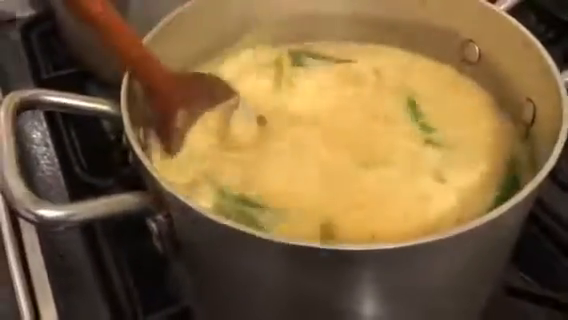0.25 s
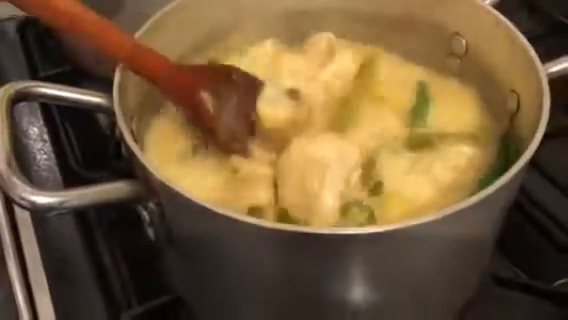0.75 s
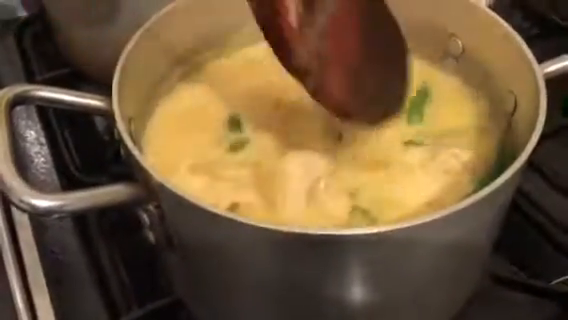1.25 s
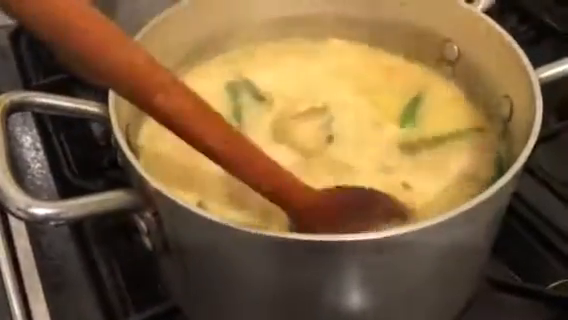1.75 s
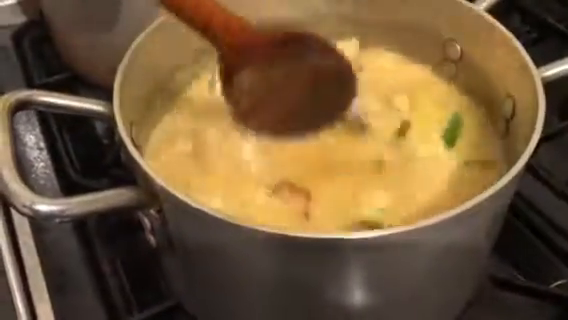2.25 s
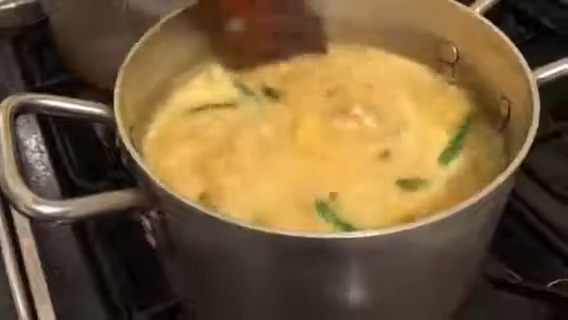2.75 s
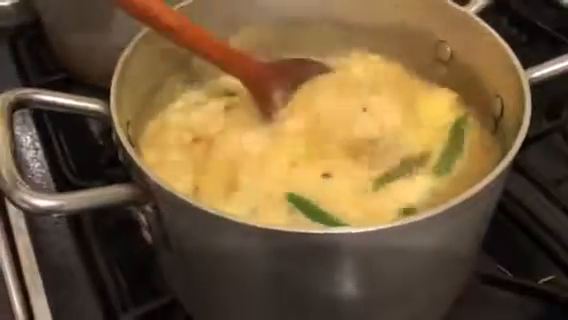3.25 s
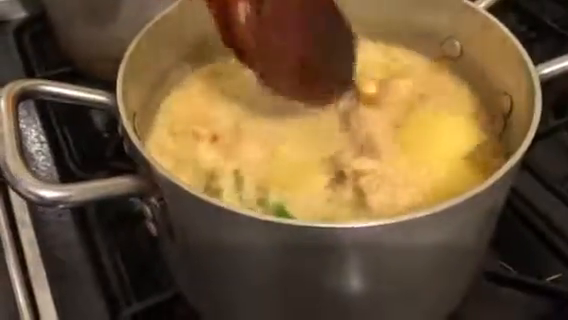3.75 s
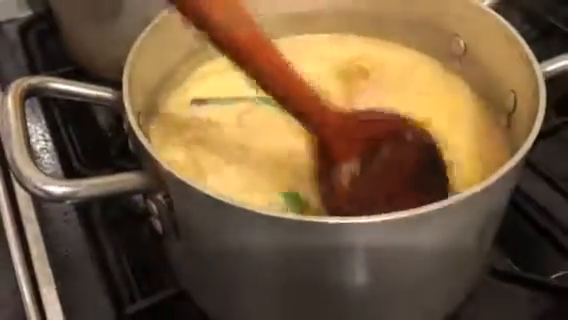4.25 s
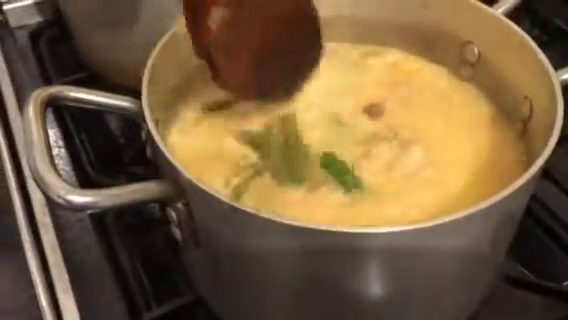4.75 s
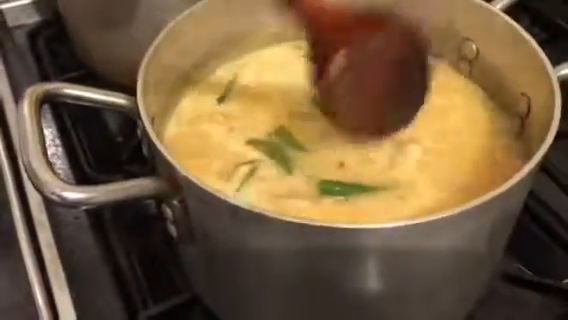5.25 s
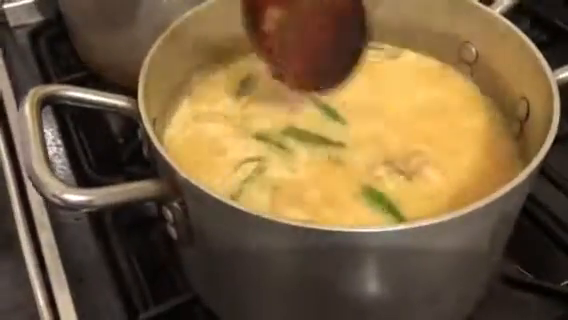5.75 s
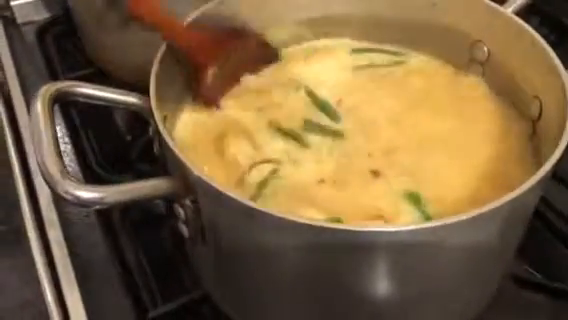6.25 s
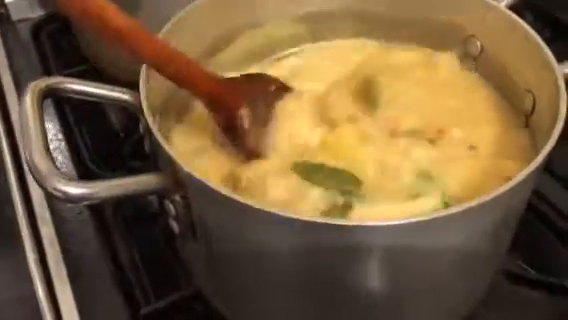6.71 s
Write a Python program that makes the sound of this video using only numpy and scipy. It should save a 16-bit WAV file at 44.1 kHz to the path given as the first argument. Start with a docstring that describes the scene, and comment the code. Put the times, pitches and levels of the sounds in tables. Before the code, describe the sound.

A wooden spoon knocks and scrapes against a metal pot of thick simmering soup, with wet bubble plops and a soft gas burner hiss.

```python
"""A wooden spoon stirs thick soup in a metal pot on a gas stove, close by in a small kitchen.
Its knocks excite damped pot modes under a noise clack; its scrapes drive the modes with random slips.
Now and then a single mode squeaks. Bubbles are short sines of rising pitch, wet clicks are noise bursts.
The burner underneath is filtered noise: a low fluttering flame and a hissing gas jet."""
import sys
import numpy as np
from scipy import signal
from scipy.fft import rfft, irfft
from scipy.io import wavfile

SR = 44100
rng = np.random.default_rng(int(sys.argv[2]) if len(sys.argv) > 2 else 0)


def int16_out(signal):
    """Quantize to a 16-bit WAV file."""
    q = np.round(np.clip(np.atleast_2d(signal).T, -1, 1) * 32767)
    wavfile.write(sys.argv[1], SR, q.astype(np.int16))


N = 307818
T = np.arange(N) / SR  # s
AGE = T[:SR // 2]  # s since an event began
TOP_HZ = 15750


def undb(db):
    """Level law: decibels to amplitude gain."""
    return 10 ** (np.asarray(db) / 20)


def unit(x):
    """Normalisation: scale to rms 1."""
    return x / np.sqrt(np.mean(x ** 2))


def fade(t60):
    """Exponential damping: the amplitude loses 60 dB in t60 seconds."""
    return np.exp(-np.log(1000) * AGE / t60)


def add(track, s, sound):
    """Superposition: mix a sound in from time s."""
    i = max(0, int(s * SR))
    track[i:i + len(sound)] += sound[:max(0, N - i)]


def colour(x, points):
    """Minimum-phase filtering: folding the cepstrum of the (Hz, dB) gain makes the filter causal."""
    size = 4096
    hz, db = np.transpose(points)
    grid = np.log(np.fft.rfftfreq(size, 1 / SR) + 1)
    log_gain = np.log(undb(np.interp(grid, np.log(hz), db)))
    cepstrum = irfft(log_gain)
    cepstrum[1:size // 2] *= 2
    cepstrum[size // 2 + 1:] = 0
    impulse = irfft(np.exp(rfft(cepstrum)))
    return signal.fftconvolve(x, impulse)[:len(x)]


def band(x, lo_hz, hi_hz, order=3):
    """Band limiting: a Butterworth band-pass kept below TOP_HZ."""
    edges = [min(lo_hz, TOP_HZ - 100), min(hi_hz, TOP_HZ)]
    return signal.sosfilt(signal.butter(order, edges, "band", fs=SR, output="sos"), x)


def walk(rate):
    """Random modulation: straight lines between normal draws, rate of them per second."""
    return np.interp(T * rate, np.arange(N // 10), rng.standard_normal(N // 10))


# modes of the filled pot: pitch_hz [Hz], t60_s [s], struck_db [dB],
# high_db [dB, rubbed high on the wall], deep_db [dB, rubbed deep in the soup]
POT_MODES = [(390.6, 0.25, -14.5, -16.5, -7), (515, 0.094, -27, -44, -6), (627, 0.066, -37, -22.5, 3),
             (689, 0.062, -1.5, -3, -3.5), (747.8, 0.19, 4.5, -1, 3.5), (958, 0.06, -7, -10, -13.5),
             (1133, 0.21, -2.5, -3.5, -9.5), (1188, 0.21, -6, 13.5, -37), (1260, 0.06, -1.5, -7, -16.5),
             (1525, 0.05, -1, -1, -17), (1596, 0.12, 7.5, 0, -12), (1780, 0.12, -2.5, -3.5, -28),
             (2140, 0.13, 0, -8.5, -15.5), (2294, 0.11, -0.5, -2, -17), (2341, 0.16, -1.5, -13, -33),
             (2375, 0.14, 2.5, -3, -27), (2874, 0.25, 1.5, -15.5, -17.5), (3268, 0.1, -1.5, -11.5, -21.5),
             (3765, 0.087, 0.5, -19, -21), (4267, 0.15, 0.5, -26, -26), (4294, 0.1, -3.5, -2, -42),
             (4820, 0.22, -38, -38, -20), (4890, 0.12, -8.5, -18, -31), (5190, 0.18, -9.5, -31, -32),
             (5700, 0.3, -15, -23, -29), (6290, 0.079, -30, -28, -23), (6620, 0.04, -1, -11.5, -28),
             (7710, 0.077, -8, -11, -30), (8500, 0.061, -11.5, -34, -30), (9200, 0.073, -9.5, -16, -41)]


def pot_ring(detune, scatter_db):
    """Modal superposition: one blow rings every mode; the sloshing soup shifts each a little."""
    hz, t60, db = np.transpose(POT_MODES)[:3]
    shift, size = rng.standard_normal((2, len(POT_MODES)))
    signs = rng.choice([-1, 1], len(POT_MODES))
    pitches = hz * (1 + detune * shift)
    gains = signs * undb(db + scatter_db * size)
    modes = zip(pitches, gains, t60)
    return sum(gain * np.sin(2 * np.pi * f * AGE) * fade(t) for f, gain, t in modes)


def shimmer(count=16):
    """High modal density: thin short-lived wall modes, differing with each place of contact."""
    out = np.zeros(len(AGE))
    for place, size in rng.random((count, 2)):
        tone = np.sin(2 * np.pi * 4900 * 2.1 ** place * AGE)
        out += size * tone * fade(0.25) * undb(-9 * place)
    return out


BOOM_HZ, BOOM_OCTAVES = 685, 0.52  # centre and width of the wall's boom
PING_HZ, PING_OCTAVES = 3040, 0.46  # centre and width of the rim's ping
TILT_HZ, TILT_FROM_HZ = 1720, 1110  # pivot of the tilt; below the second the tilt gain is constant


def blow_colour(bright_db, boom_db, ping_db):
    """Contact stiffness: a harder blow tilts to treble; its place brings out wall boom or rim ping."""
    hz = np.geomspace(200, 12000, 24)
    boom = np.exp(-.5 * (np.log2(hz / BOOM_HZ) / BOOM_OCTAVES) ** 2)
    ping = np.exp(-.5 * (np.log2(hz / PING_HZ) / PING_OCTAVES) ** 2)
    tilt = np.log2(np.maximum(hz, TILT_FROM_HZ) / TILT_HZ)
    return list(zip(hz, bright_db * tilt + boom_db * boom + ping_db * ping))


# spectrum of the dry clack of wood on metal: pitch_hz [Hz], level_db [dB]
CLACK_SPECTRUM = [(100, -27.5), (300, -0.5), (500, -13), (700, -4.5), (950, -6), (1550, 0.5), (1980, -14),
                  (2300, -6.5), (4200, -6), (4550, -16), (5100, -3), (8500, -19), (10500, -21),
                  (11700, -19.5), (15500, -25)]
# spoon knocks: start_s [s], level_db [dB], thump_db [dB, thump on the grate],
# bright_db [dB per octave], boom_db [dB, extra wall boom], ping_db [dB, extra rim ping]
SPOON_KNOCKS = [(0.541, -15.5, -37, -.5, 4.5, -8), (1.8875, -24, -65, -0.3, 8, -5),
                (2.8564, -26, -48, -7, 0, 0), (4.028, -16, -62, 1, 3.5, 0), (4.248, -42, -62, 2.5, 11.5, 2),
                (5.0962, -19.5, -68, 0.6, -3, -1.5), (5.806, -31.5, -52, 5, 19.5, 2),
                (6.35, -32.5, -43, -8, -6, -9), (6.358, -20.5, -41.5, 2, 2, 0),
                (6.9478, -15, -57, 0.4, 0, 1)]
THUMP_HZ = 146  # the pot rocking on the grate


def knocks():
    """Impact excitation: each blow clacks the wood, rings the pot and jolts it on the grate."""
    out = np.zeros(N)
    for s, db, thump_db, bright_db, boom_db, ping_db in SPOON_KNOCKS:
        grain = unit(colour(rng.standard_normal(len(AGE)), CLACK_SPECTRUM))
        clack = grain * undb(-5.5) * fade(0.036)
        clack += grain * undb(-19.5) * fade(0.3)
        ring = undb(-9) * pot_ring(detune=0.0013, scatter_db=2.8)
        ring += undb(-22.5) * shimmer()
        pressed = .5 + .5 * fade(0.047)  # the spoon stays on the wall and soaks up part of the ring
        spread = 1 - np.exp(-AGE / 0.001)  # the blow takes a moment to travel round the wall
        blow = spread * (clack + ring * pressed)
        add(out, s, undb(db) * colour(blow, blow_colour(bright_db, boom_db, ping_db)))
        rumble = rng.standard_normal(len(AGE))
        thump = unit(band(rumble, THUMP_HZ / 2.9, THUMP_HZ * 1.09, order=2))
        add(out, s, undb(thump_db) * thump * fade(0.35))
    return out


TOUCH_DB, EASE_DB_PER_S = -23.5, -13.5  # a bare touch against full pressure; easing during the hold


def pressure_db(t, press, hold, release):
    """Contact force: the hand leans in, holds while easing off, and lets go."""
    eased = EASE_DB_PER_S * hold
    corners = np.cumsum([0, press, hold, release])
    return np.interp(t, corners, [TOUCH_DB, 0, eased, eased + TOUCH_DB])


def resonate(x, hz, t60):
    """Driven resonance at rms 1: the moving spoon loads the wall and bends the mode's pitch."""
    pole = np.exp((2j * np.pi * hz - np.log(1000) / t60) / SR)
    t = np.arange(len(x)) / SR
    bend = 0.00403 * np.interp(t * 9, np.arange(32), rng.standard_normal(32))
    # the contact passes over nodes and bellies of the mode, so its share comes and goes
    reach = undb(4.4 * np.interp(t * 14, np.arange(32), rng.standard_normal(32)))
    ringing = signal.lfilter([1], [1, -pole], x * reach)
    bending = np.exp(2j * np.pi * hz * np.cumsum(bend) / SR)
    return unit(np.imag(ringing * bending))


# strokes of the spoon dragging on the wall: start_s [s], press_s [s], hold_s [s], release_s [s],
# level_db [dB], depth_start [0-1, 1 is deep in the soup], depth_end [0-1],
# bright_db [dB per octave at the start], slowing [0-1]
SPOON_STROKES = [(0.626, .12, 0.039, 0.053, -38, 0, 0.2, 2.5, 0.13),
                 (1.929, 0.12, 0.1, .05, -40, .6, .15, 2.5, 0.16),
                 (2.981, 0.072, .03, 0.13, -51, 0.7, .6, 9, 0.46),
                 (3.194, 0.094, 0.016, 0.32, -43.5, .95, 0.91, -1.5, 0),
                 (4.11, 0.11, .42, 0.047, -41, 0.63, 0.76, 4, 0.18),
                 (5.14, 0.052, .14, 0.22, -45, 0.3, .9, 6.5, 0.97),
                 (5.818, .12, .09, 0.068, -36.5, 1, .6, 4.5, 0.41),
                 (6.369, 0.014, 0.22, 0.059, -42.5, 0.39, 0.66, 7, 0.57)]
SLOWING_DB_PER_OCTAVE = -19.5  # brightness change over a stroke whose slowing is 1
SLIPS_PER_S = 900  # high on the wall; twice as many deep in the soup
GRIP_DB, GRIP_RATE, RASP_DB = 4, 80, -17.5  # spread and draws per second of the grip; rasp before brightness


def scrapes():
    """Stick-slip friction: a spray of tiny taps drives the modes; depth decides which they reach."""
    out = np.zeros(N)
    hz, t60, _, high_db, deep_db = np.transpose(POT_MODES)[:, :, None]
    octaves = np.log2(np.minimum(hz, 4000) / 1000)
    for s, press, hold, release, db, depth_start, depth_end, start_bright_db, slowing in SPOON_STROKES:
        length = press + hold + release
        t = T[:min(int(length * SR), SR)]
        depth = np.clip(depth_start + (depth_end - depth_start) * t / length, 0, 1)
        # a quicker spoon is brighter and adds dry rasp
        bright_db = start_bright_db + SLOWING_DB_PER_OCTAVE * slowing * t / length
        chance, size = rng.random(SR)[:len(t)], rng.standard_normal(SR)[:len(t)]
        grip = undb(GRIP_DB * walk(GRIP_RATE)[:len(t)])  # the grip comes and goes in quick bursts
        slipping = chance < SLIPS_PER_S * (1 + depth) / SR
        slips = slipping * size * grip
        gains = undb(high_db + depth * (deep_db - high_db) + bright_db * octaves)
        gains = gains / np.sqrt(np.sum(gains ** 2, axis=0))
        modes = zip(gains, hz[:, 0], t60[:, 0])
        ring = sum(g * resonate(slips, f, decay) for g, f, decay in modes)
        rasp = unit(colour(slips, CLACK_SPECTRUM)) * undb(RASP_DB + bright_db)
        contact = np.clip(np.minimum(t, length - t) / 0.0027, 0, 1)
        stroke_gain = undb(db + pressure_db(t, press, hold, release))
        add(out, s, contact * stroke_gain * (ring + rasp))
    return out


# brief squeaks: peak_s [s], level_db [dB], pitch_hz [Hz], swell_s [s, Gaussian width]
SPOON_SQUEAKS = [(1.999, -33.5, 1580, 0.003), (3.096, -41.5, 2313, 0.0067), (5.2285, -32.5, 671, 0.0037),
                 (5.960, -55.5, 2850, 0.055), (6.457, -41, 2370, 0.015)]


def squeaks():
    """Mode locking: the slipping wood swells one mode, whose pitch trembles with the grip."""
    out = np.zeros(N)
    middle = AGE.mean()
    for s, db, hz, swell in SPOON_SQUEAKS:
        pitch = hz * (1 + 0.0025 * walk(129)[:len(AGE)])
        envelope = np.exp(-.5 * ((AGE - middle) / swell) ** 2)
        tone = np.sin(2 * np.pi * np.cumsum(pitch) / SR)
        add(out, s - middle, undb(db) * envelope * tone)
    return out


def bubble(hz, cycles, glide):
    """Cavity resonance: a sine loses 60 dB in a few cycles while its pitch rises by the glide."""
    t = AGE[:int(SR * cycles / hz)]
    life = t * hz / cycles
    return np.sin(2 * np.pi * hz * t * (1 + glide * life / 2)) * np.exp(-np.log(1000) * life)


# spectrum of the soup slopping back: pitch_hz [Hz], level_db [dB]
SLOP_SPECTRUM = [(50, 14.5), (80, 2.0), (160, 14), (260, -5), (400, -5), (520, 14),
                 (700, -0.5), (1100, -9), (1600, -14), (3000, -5)]
# big bubbles bursting through the thick soup: start_s [s], level_db [dB], pitch_hz [Hz, cavity],
# ring_cycles [cycles], snap_db [dB, skin against cavity], snap_hz [Hz]
BIG_BUBBLES = [(0.001, -25.5, 595, 3.7, -1.5, 1230), (0.3022, -18.5, 276, 3.2, -9, 600),
               (1.36, -43.5, 275, 8.8, -5, 900), (1.7776, -16.5, 260, 5.5, 3.5, 1200),
               (2.5185, -32.5, 500, 2.1, 3, 905), (2.6370, -46, 624, 2.2, 15, 1360),
               (2.808, -34.5, 190, 8.6, 1, 1390), (3.0532, -17, 282, 6, 5.5, 1240),
               (6.182, -39.5, 490, 19, -5, 920), (6.4790, -27.5, 668, 44, -11, 1200),
               (6.4870, -22, 275, 3.1, -6, 554)]


def plops():
    """Bubble bursting: the skin snaps, the cavity rings briefly, and the soup slops back in."""
    out = np.zeros(N)
    for s, db, hz, cycles, snap_db, snap_hz in BIG_BUBBLES:
        add(out, s, undb(db + snap_db) * bubble(snap_hz, cycles=2.5, glide=0.24))
        add(out, s + 0.00044, -undb(db) * bubble(hz, cycles, glide=0.044))
        slop = unit(colour(rng.standard_normal(len(AGE)), SLOP_SPECTRUM))
        size = min(1, 300 / hz)  # low-pitched bubbles are larger and move more soup
        add(out, s, undb(db - 18.5) * size * slop * fade(0.2))
    return band(out, 53, 1720, order=3)


# small wet clicks as the spoon moves through the surface:
# start_s [s], level_db [dB], pitch_hz [Hz, places the noise band], length_s [s, 60 dB decay]
WET_CLICKS = [(.4625, -34, 1330, 0.0064), (0.497, -32, 1190, 0.0084), (0.985, -38.5, 1650, 0.2),
              (2.4377, -32.5, 5500, 0.0039), (2.4410, -32.5, 7000, 0.0071), (3.838, -41, 1500, .01),
              (4.7, -39, 2250, 0.039), (5.624, -44, 2020, 0.022), (6.712, -37.5, 2000, 0.018)]


def smacks():
    """Film rupture: soup films tear with a decaying burst of broad-band noise."""
    out = np.zeros(N)
    for s, db, hz, length in WET_CLICKS:
        burst = rng.standard_normal(len(AGE)) * fade(length)
        add(out, s, undb(db) * band(burst, hz / 3.6, hz * 2, order=2))
    return out


def simmer(count=330):
    """Random superposition: many small bubble cavities, a few of them louder than the rest."""
    out = np.zeros(N)
    for when, pitch, size in rng.random((count, 3)):
        db = -57 - 2.8 * np.log(max(size, .02))
        add(out, when * N / SR, undb(db) * bubble(170 * 11 ** pitch, cycles=19.7, glide=0.27))
    return out


# spectrum of the flame's rumble: pitch_hz [Hz], level_db [dB per Hz]
FLAME_SPECTRUM = [(20, -54), (40, -5), (70, 3.5), (120, -0.5), (180, -5), (260, -5.5), (400, -14.5),
                  (900, -15), (1400, -12), (2000, -20.5), (3000, -17.5), (6000, -55)]
# resonances of the gas jet's hiss: pitch_hz [Hz], width_hz [Hz], level_db [dB]
JET_RESONANCES = [(3170, 170, -2.5), (3542, 200, 3), (4110, 960, -5), (5373, 480, -1), (6250, 1500, -13),
                  (7410, 1020, -9), (8700, 840, -10.5), (9960, 420, -5.5), (11470, 220, -3.5),
                  (12000, 280, -0.5), (12900, 130, 1.5), (13330, 2500, -6), (15400, 580, 0)]
FLAME_DB, JET_DB = -56.5, -54.5  # levels about which each wanders


def burner():
    """Turbulent noise: the flame flutters low while the gas jet hisses through its resonant tube."""
    flutter_db = .8 * walk(3) + 1.1 * walk(22)
    flame = unit(colour(rng.standard_normal(N), FLAME_SPECTRUM)) * undb(FLAME_DB + flutter_db)
    jet = np.zeros(N)
    for hz, width, db in JET_RESONANCES:
        jet += undb(db) * band(rng.standard_normal(N), hz - width / 2, hz + width / 2, order=2)
    return flame + unit(jet) * undb(JET_DB + 1.15 * walk(2.71))


def kitchen(x, wet_db, t60):
    """Reverberation: hob and near walls answer within milliseconds as a decaying noise tail."""
    tail = rng.standard_normal(len(AGE)) * fade(t60) * (AGE > .004)
    tail = tail / np.sqrt(np.sum(tail ** 2))
    tail = colour(tail, [(100, 2.5), (280, 0), (1000, 2.5), (4000, 4), (12000, -24.0)])
    return x + undb(wet_db) * signal.fftconvolve(x, tail)[:N]


def scene():
    """Superposition of sources: spoon and soup reverberate; the burner is added dry."""
    stove = knocks() + scrapes() + squeaks() + plops() + smacks() + simmer()
    return (kitchen(stove, wet_db=-7, t60=0.37) + burner())[None]


def record(dry):
    """Band-limited transduction: the microphone loses the deepest bass and the top."""
    sound = signal.sosfilt(signal.butter(2, 45, "high", fs=SR, output="sos"), dry)
    return signal.sosfilt(signal.ellip(10, .2, 75, TOP_HZ, fs=SR, output="sos"), sound)


dry = scene()
out = record(dry)
int16_out(out)
```